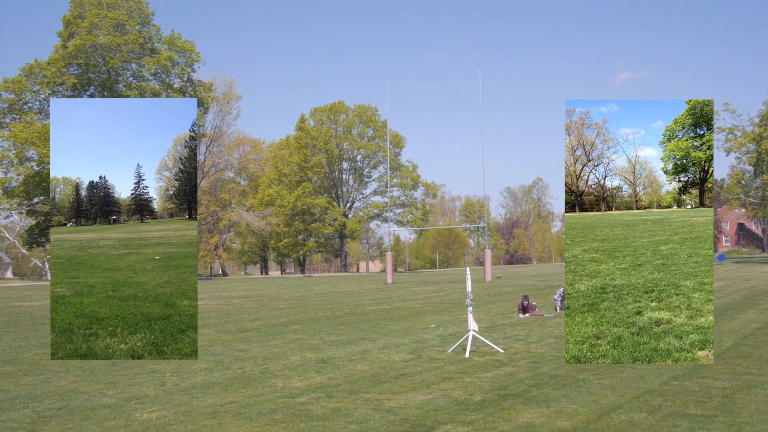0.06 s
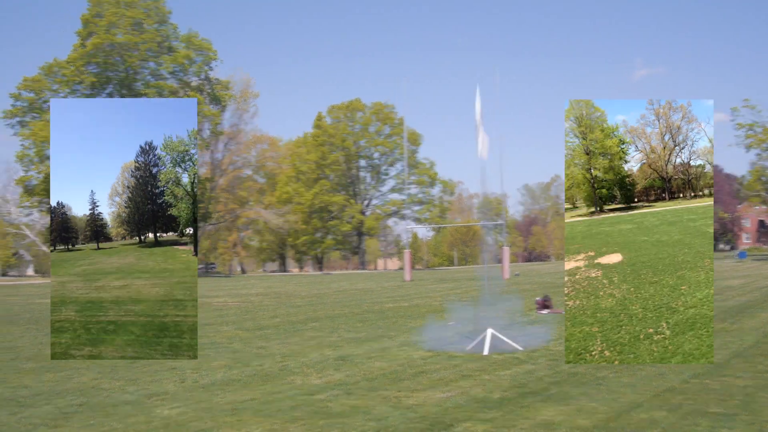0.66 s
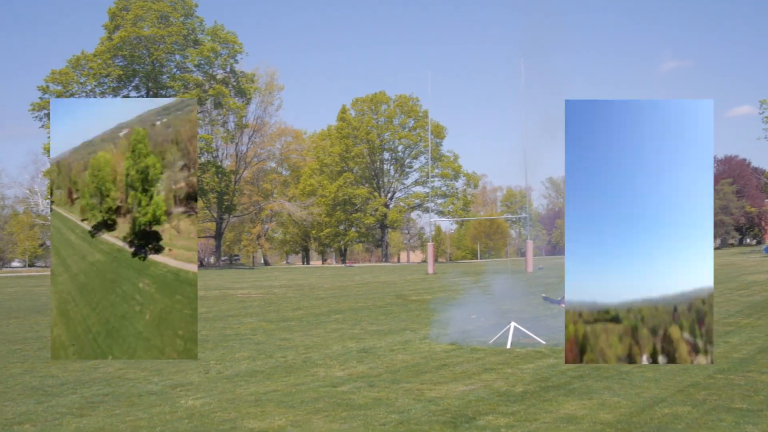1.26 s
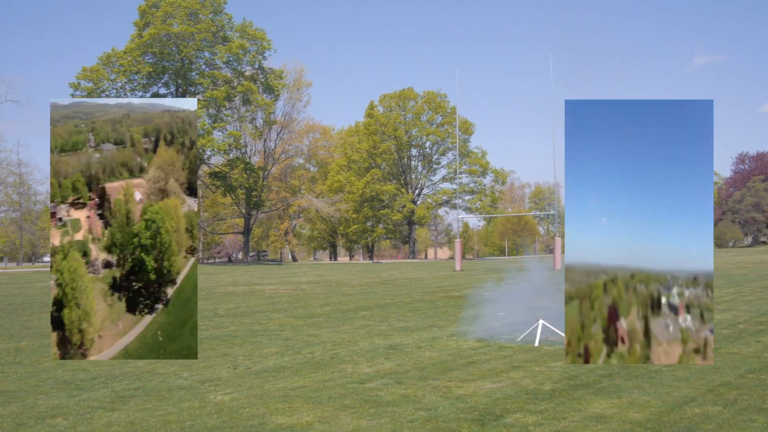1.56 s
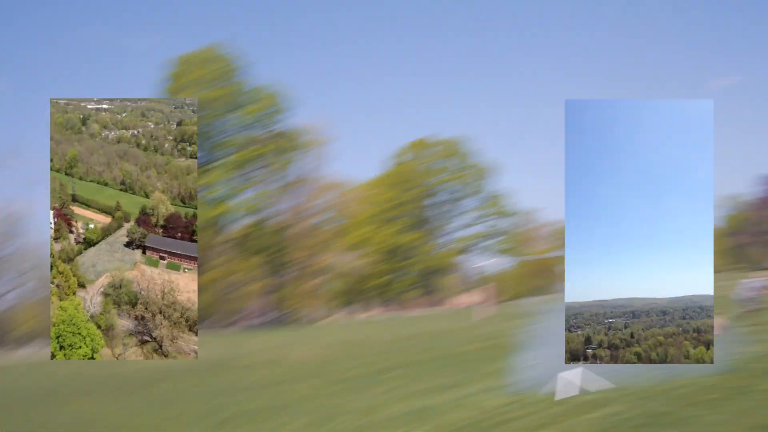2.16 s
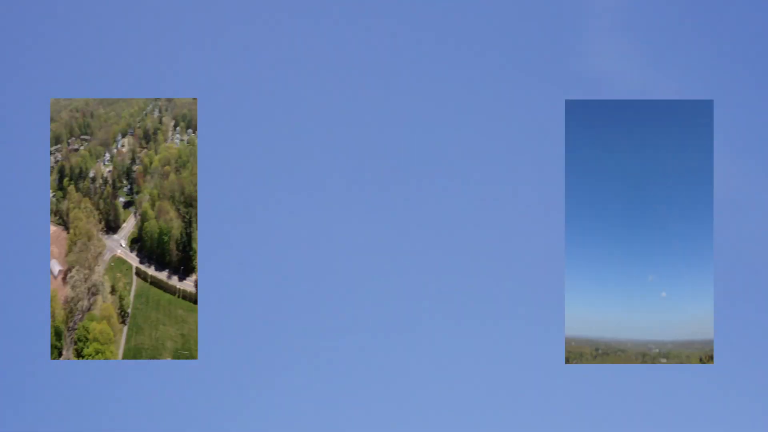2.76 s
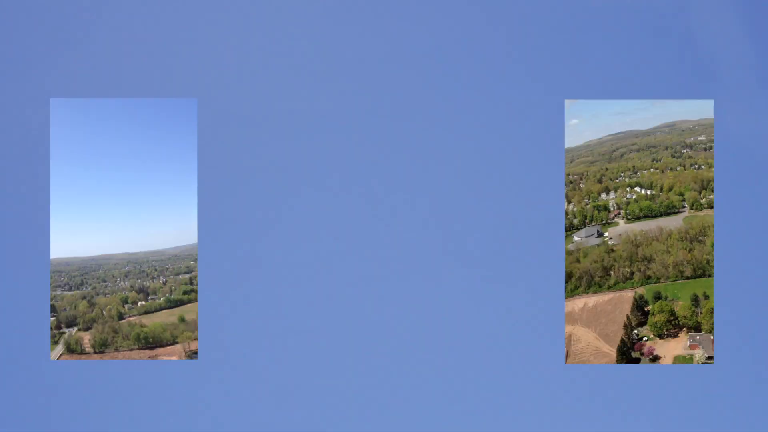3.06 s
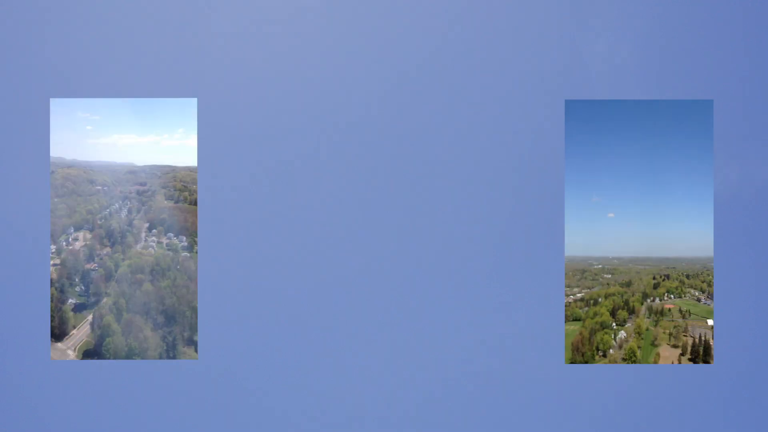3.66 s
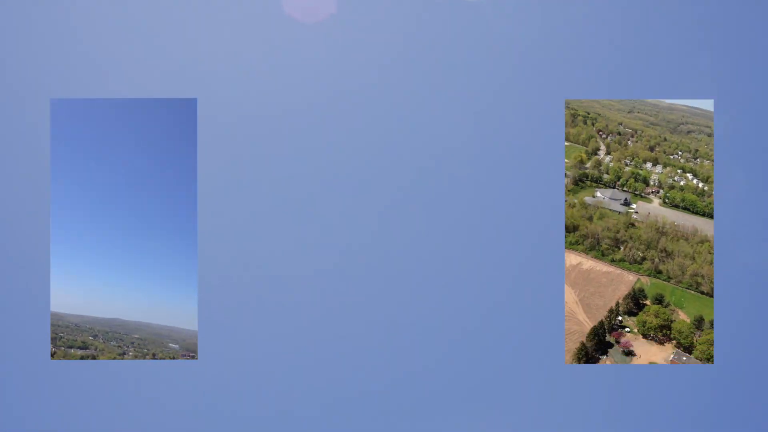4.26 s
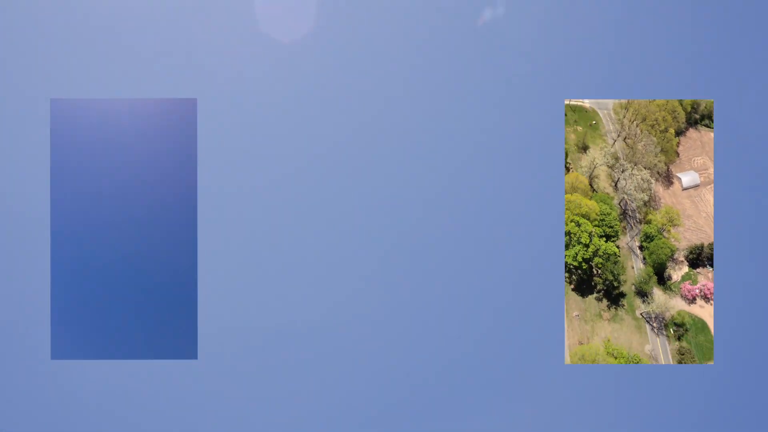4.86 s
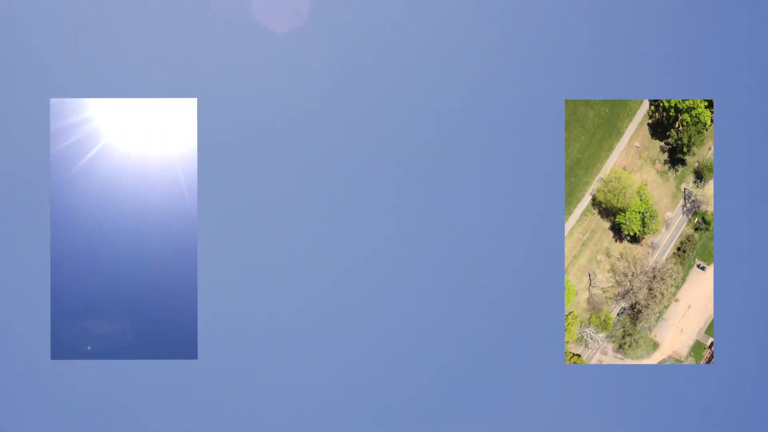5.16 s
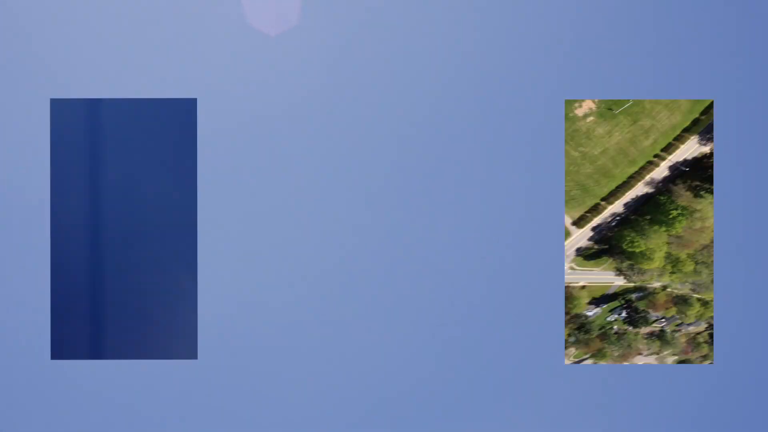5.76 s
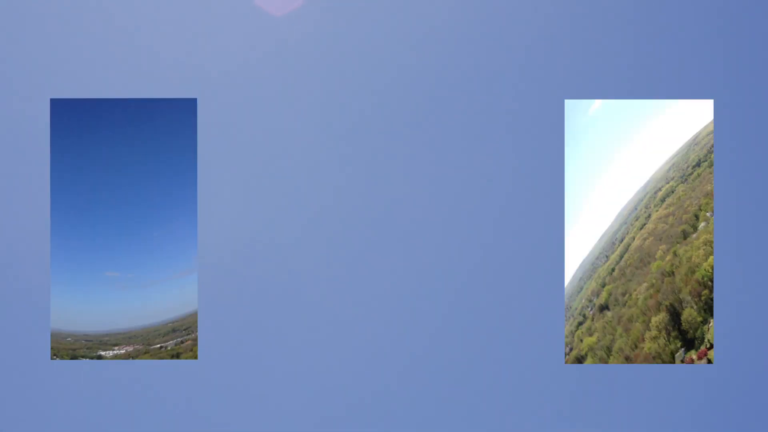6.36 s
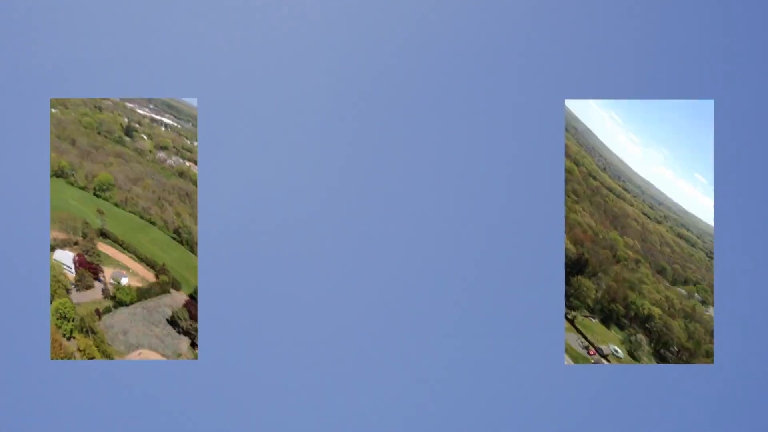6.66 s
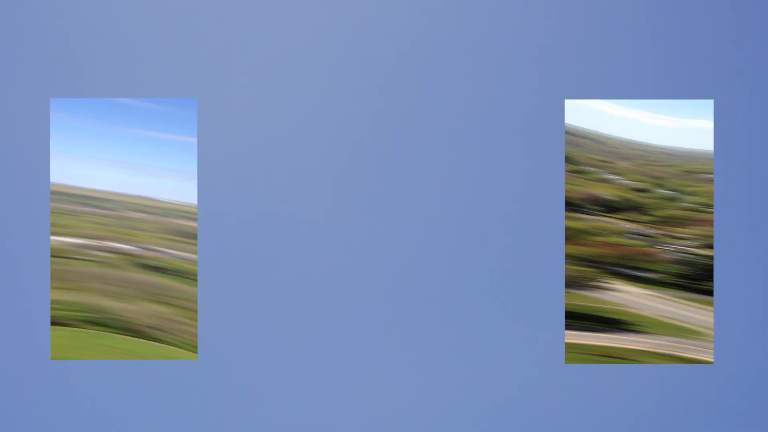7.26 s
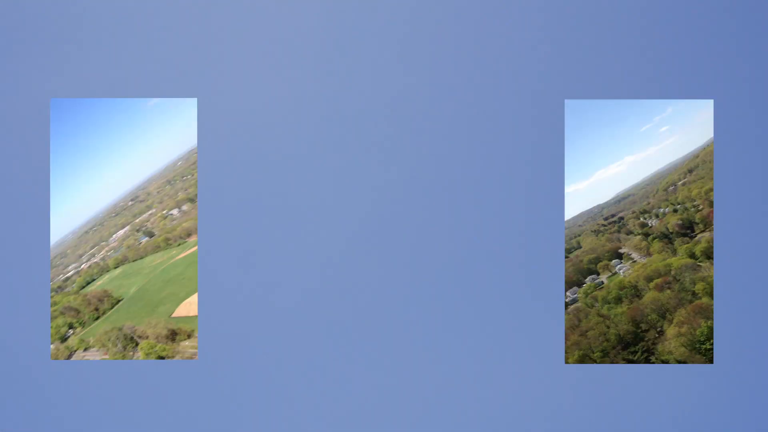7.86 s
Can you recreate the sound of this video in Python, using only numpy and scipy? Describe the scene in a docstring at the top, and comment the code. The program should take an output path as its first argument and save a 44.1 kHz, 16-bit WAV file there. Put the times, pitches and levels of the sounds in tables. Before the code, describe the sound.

An igniter pops and a hollow hiss swells into the loud roar of a model rocket, heard outdoors from a small microphone on its body. The roar fades into low, buffeting air with a few clicks. The ejection charge fires with a sharp crack and a clatter, and the open tube tumbles through uneven gusts, with hollow thumps, clicking fittings and a quick whoosh.

```python
"""Over a faint breeze an igniter pops: a model rocket, heard from a small microphone riding on its body.
The nozzle's hollow hiss swells to a roar, splashes off the pad and burns out; air tears past the tube.
The ejection charge fires with a crack and a gust, and the open body tumbles in slower, lumpier air.
Gusts rasp over the port, jolts thump the tube and set the housing humming, loose fittings click,
and the port whooshes as it swings through the airstream."""
import sys
import numpy as np
from scipy import signal
from scipy.fft import rfft, irfft, next_fast_len
from scipy.io import wavfile
from scipy.ndimage import uniform_filter1d, map_coordinates

SR = 44100
rng = np.random.default_rng(int(sys.argv[2]) if len(sys.argv) > 2 else 0)


def store_wav(level_fs):
    """Save 16-bit WAV to argv[1]."""
    pcm = np.round(np.clip(np.atleast_2d(level_fs), -1, 1) * 32767)
    wavfile.write(sys.argv[1], SR, pcm.T.astype(np.int16))


N = 348390
TIME = np.arange(N) / SR
IGNITION_S, LIFT_S, BURNOUT_S, EJECTION_S = .06, 0.55, 2.1, 3.53
CROSSOVER_HZ, TOP_HZ = (800, 3500), 15400  # low/middle/high splits; the microphone's upper limit

# ring of the motor casing: pitch_hz, level_db, t60_s
CASING_MODES = [(610, 4.5, 0.0093), (2050, 8.5, 0.0094), (8060, -14, 0.0067)]
# chamber pressure building to full thrust: time_s, level_db
CHAMBER_PRESSURE = [(.066, -25), (.1, -33.5), (.22, -28.5), (.28, -24.5), (.33, -18), (.376, -5.5)]
# base pitch of the nozzle's resonances, rising as the gas heats: time_s, pitch_hz
NOZZLE_PITCH = [(.06, 800), (.1, 719), (.22, 1060), (.33, 1296)]
# tone of the exhaust: frequency_hz, level_db
EXHAUST_SPECTRUM = [(40, -45), (90, -36), (160, -10.5), (320, -7), (850, 2.5), (2100, 7.5), (3300, 2),
                    (6800, 0), (8500, -2.5), (10200, -8.5), (12700, -5), (15500, -11.5)]
# low, middle and high band of the roar: level_db, db_per_pressure_db, flight_fade_db_per_s
ROAR_BANDS = [(-20, 0.84, 2.5), (-12, 0.97, 8), (-10, 1.26, 12.5)]
# two paths along the body cancel the exhaust here: centre_hz, width_hz, gain_db
BODY_NOTCHES = [(1494, 210, -3), (3340, 380, -8.5), (5080, 600, -8.5), (11100, 500, -3.5)]
# hollow ring of the exhaust as the rocket climbs away: centre_hz, width_hz, gain_db
CLIMB_PEAKS = [(2250, 420, 3), (3960, 220, 3)]
# the gap above the blast plate resonates lower as the rocket lifts: time_s, pitch_hz, level_db
PLATE_SWEEP = [(.378, 5200, -25), (.44, 3200, -19.5), (.485, 2000, -12.5), (.5, 894, -18),
               (.54, 724, -17.5), (.58, 357, -13), (.61, 320, -37)]
# roar thrown back by the pad: low_db, middle_db, high_db
PAD_BANDS_DB = [-28, -19.5, -22.5]
# brief sub-bass thuds as the microphone overloads on hard hits: start_s, level_db
OVERLOAD_THUDS = [(0.384, -22.5), (4.91, -23)]
# tone of the air in straight flight: frequency_hz, level_db
FLIGHT_SPECTRUM = [(40, -31), (70, -32.5), (110, -13), (160, -3.5), (305, 3.5), (420, -4), (540, -3),
                   (750, -15), (1500, -24.5), (2300, -26), (3100, -34), (8000, -42.5), (10300, -54)]
# buffet, rush and hiss in straight flight: top_speed_db, speed_exponent, yaw_share
AIR_BANDS = [(-14.5, 0.74, 1), (-20.5, 1.7, 0.45), (-26, 3.43, 0.037)]
# buffeting rides up and down as the rocket yaws into the flow: time_s, gain_db
YAW_BUFFET = [(1.25, -0.1), (1.8, 3.5), (1.93, -2), (2.05, -.5), (2.76, -0.2), (3.15, -4), (3.3, 1.5),
              (3.5, 0)]
# brief swerves on top of the yaw: peak_s, gain_db
SWERVE_BUFFET = [(1.849, 5), (2.31, -1.5), (2.52, 3), (2.76, 5), (3.362, 3.5)]
# sharp contacts of nose cone, cord and fittings: start_s, level_db, brightness_db, knock_hz
CONTACTS = [(2.129, -15.5, -15, 2400), (2.703, -21.5, -12, 2400), (2.953, -19, -11, 2040),
            (3.287, -17.5, -11.5, 1930), (3.539, 0, -5, 1970), (3.55, -7, -4, 2000),
            (3.586, -3.5, -19, 1200), (3.592, 0, -23, 1100), (3.6, -3, -19, 880), (3.602, -10, -10, 2520),
            (3.674, -14.5, -26, 910), (3.732, -21, -18, 800), (3.755, -24, -14, 1190),
            (3.779, -11, -27, 830), (3.836, -20, -12.5, 1020), (3.964, -25.5, -36, 905),
            (4.353, -23.5, -14, 1240), (5.194, -25, -16, 1710), (5.617, -24, -24, 2370),
            (5.783, -30.5, -24, 2220), (5.849, -22, -26, 2140), (6.119, -26.5, -4, 1110),
            (6.325, -8.5, -3.5, 980), (6.375, -16.5, -26, 845), (6.398, -21, -30, 3170),
            (6.464, -28, -13, 1710), (6.513, -14.5, -12.5, 1600), (6.81, -27.5, -9, 1970),
            (7.403, -8, -23, 1000), (7.437, -32.5, -6, 1920), (7.521, -20, -25, 1990),
            (7.599, -9, -34, 840), (7.646, -30, -13, 1500), (7.81, -20.5, -26, 1360),
            (7.855, -29, -7, 1700)]
# tone of the air in the tumble: frequency_hz, level_db
TUMBLE_SPECTRUM = [(45, -27), (110, -12), (170, -2.5), (260, -1), (380, -3), (620, -12), (1000, -10),
                   (1600, -19.5), (2400, -20), (3300, -27.5), (4600, -27), (5600, -33), (8300, -31.5),
                   (9600, -45.5), (15500, -50)]
# air over the tumbling body: time_s, buffet_db, rush_db
TUMBLE_FLOW = [(3.53, -21.5, -36), (3.68, -20, -46), (3.81, -31, -49), (4.23, -31.5, -50), (4.84, -38, -51),
               (5.01, -54, -65.5), (5.33, -40.5, -60), (5.5, -31.5, -41), (5.68, -24, -35),
               (6.33, -25.5, -45), (6.76, -23.5, -43), (6.88, -29.5, -52.5), (7.06, -33.5, -54),
               (7.31, -24, -46), (7.47, -28.5, -55), (7.64, -30.5, -43.5), (7.72, -33.5, -58.5),
               (7.89, -28.5, -57)]
# modes of the body tube once its end is open: centre_hz, width_hz, gain_db
OPEN_TUBE_MODES = [(247, 24, 1.5), (352, 23, 3), (595, 26, 10)]
# cord and air scuff past the housing: start_s, length_s, rise_s, level_db, buffet_offset_db
GUST_CUES = [(3.532, 0.029, 0.0051, -19, 7), (3.553, 0.052, 0.0069, -25.5, 15),
             (3.605, 0.027, .003, -26.5, -12), (3.753, 0.016, 0.0018, -34, 19.5),
             (3.851, 0.036, 0.0039, -42, 18.5), (4.282, 0.044, 0.0078, -42, 3),
             (4.382, 0.035, 0.008, -46, 7), (4.595, 0.017, 0.0097, -19.5, 4.5),
             (4.629, 0.027, 0.005, -37, 16), (4.764, 0.025, 0.0086, -26, 8),
             (4.87, 0.066, 0.0045, -39.5, 11.5), (4.894, 0.016, 0.0094, -22.5, 7),
             (5.056, 0.047, 0.0064, -47, 10.5), (5.179, 0.024, 0.0023, -36.5, 11.5),
             (5.26, 0.039, 0.026, -42.5, 11.5), (5.632, 0.066, 0.012, -48.5, 18),
             (6.026, 0.07, .008, -31, 16.5), (6.186, .1, 0.027, -33, 0), (6.516, 0.084, 0.002, -30.5, 17),
             (6.633, 0.12, 0.0048, -36.5, 14), (6.934, 0.033, 0.0042, -32.5, 16.5),
             (7.14, 0.14, 0.0022, -32, 14.5), (7.485, 0.072, 0.0043, -36.5, -15),
             (7.583, 0.029, 0.0032, -33.5, 12), (7.746, 0.0081, 0.0027, -36.5, -10)]
# low cut on the gusts, thinnest while the body hangs near the top of its flight: time_s, cutoff_hz
GUST_LOW_CUT = [(3.9, 110), (4.9, 260), (5.6, 165)]
# hum of the housing: pitch_hz, gain_db, t60_s
HOUSING_MODES = [(167.4, 3.5, 0.48), (433, -4.5, 0.17)]
# thumps of the jolted tube: start_s, level_db, pitch_hz
JOLT_CUES = [(3.713, -2, 253), (3.776, -5.5, 252), (3.836, -1.5, 271), (4.686, -10, 264),
             (4.699, -12.5, 167), (4.909, -7, 378), (5.193, -14, 360), (6.08, -7, 337), (6.12, -10, 392),
             (6.214, -11.5, 386), (6.324, -12.5, 548), (6.371, -8.5, 236), (6.409, -6, 176),
             (6.576, -1, 368), (7.092, -8.5, 377), (7.298, -8, 183), (7.402, -13, 480), (7.599, -7.5, 326),
             (7.681, -18, 390)]
# the port swings through the airstream: peak_s, level_db, rise_s, fall_s
PORT_SWINGS = [(5.44, -37.5, 0.038, 0.024), (6.013, -16, .02, 0.021)]


def amp(db):
    """Decibels to gain."""
    return 10 ** (np.asarray(db) / 20)


def unit(x):
    """Scale to rms 1."""
    return x / np.sqrt(np.mean(x ** 2) + 1e-20)


def held(bands, size):
    """Ride each band to rms 1 over a window of size samples."""
    return bands / np.sqrt(np.abs(uniform_filter1d(bands ** 2, size=size, axis=1)) + 1e-20)


def curves(rows):
    """One automation curve for each column after the time."""
    times, *columns = np.transpose(rows)
    return [np.interp(TIME, times, column) for column in columns]


def wobble(rate):
    """A smooth random curve, rate knots a second."""
    return map_coordinates(rng.standard_normal(int(N * rate / SR) + 4), [TIME * rate])


def add(track, start_s, sound):
    """Drop a short sound onto the track."""
    part = track[round(start_s * SR):][:len(sound)]
    part += sound[:len(part)]


def filtered(x, response):
    """Equalise x with a gain given as a function of frequency."""
    size = next_fast_len(N + SR // 2)
    return irfft(rfft(x, size) * response(np.fft.rfftfreq(size, 1 / SR)), size)[:N]


def bell_eq(x, bells):
    """Equalise x with smooth peaks or dips."""
    return filtered(x, lambda f: amp(sum(db * np.exp(-((f - hz) / w) ** 2) for hz, w, db in bells)))


def resonant_noise(centre_hz, width_hz):
    """Noise in a moving resonance with steep skirts, rms 1."""
    smooth = signal.butter(3, width_hz / 2, fs=SR, output="sos")
    drift = signal.sosfilt(smooth, rng.standard_normal(N) + 1j * rng.standard_normal(N))
    return unit(np.real(drift * np.exp(2j * np.pi * np.cumsum(centre_hz) / SR)))


def patchy(x, depth_db, size=512):
    """Shifting colour: short-lived peaks a few hundred Hz wide."""
    frames = signal.stft(x, nperseg=size)[2]
    ripple = rng.standard_normal(frames.shape)
    for _ in range(2):
        ripple = uniform_filter1d(uniform_filter1d(ripple, size=4, axis=0), size=9, axis=1)
    return signal.istft(frames * amp(depth_db * unit(ripple)), nperseg=size)[1][:N]


def turbulence(spectrum, patch_db, eddy_db=0, grain_db=0, size=4000):
    """Low, middle and high noise bands: eddies shake all three together, grain breaks up the top two."""
    hz, db = np.transpose(spectrum)
    white = patchy(rng.standard_normal(N), patch_db)
    noise = filtered(white, lambda f: amp(np.interp(np.log(f + 1), np.log(hz), db)))
    low, low_mid = [filtered(noise, lambda f: 1 / (1 + (f / edge) ** 8)) for edge in CROSSOVER_HZ]
    eddies = amp(eddy_db * wobble(70))
    grain = amp(grain_db * 2 * np.tanh(wobble(380) / 2))
    return held(eddies * np.array([low, (low_mid - low) * grain, (noise - low_mid) * grain]), size)


def breeze(level_db=-59):
    """A faint, low bed of wind over the launch field."""
    wind = filtered(rng.standard_normal(N), lambda f: f ** 3 / (f ** 3 + 130 ** 3) / (1 + (f / 330) ** 1.5))
    return amp(level_db) * unit(wind)


def igniter(start_s=0.058, level_db=-17, attack_s=0.00093):
    """The igniter pops and rings the motor casing."""
    out, t = np.zeros(N), np.arange(SR // 10) / SR
    ring = sum(amp(db - 60 * t / t60) * np.sin(2 * np.pi * hz * t) for hz, db, t60 in CASING_MODES)
    add(out, start_s, amp(level_db) * ring * (1 - np.exp(-t / attack_s)))
    return out


def nozzle_hiss():
    """Gas hisses in three of the nozzle's odd resonances, one to a band."""
    hz, = curves(NOZZLE_PITCH)
    high = amp(-17) * resonant_noise(9 * hz, width_hz=1200)
    low = resonant_noise(.88 * hz, width_hz=440)
    middle = amp(-3) * resonant_noise(3 * hz, width_hz=620)
    return np.array([low, middle, high])


def motor(choke_s=0.305, choke_spread_s=0.066, leak=0.02, tail_s=0.57):
    """The hollow hiss opens into a broad jet as pressure builds, then falls behind and burns out."""
    pressure_db, = curves(CHAMBER_PRESSURE)
    flown_s = np.maximum(TIME - LIFT_S, 0)
    levels = amp([db + grows * pressure_db - fade * flown_s for db, grows, fade in ROAR_BANDS])
    choked = (1 + np.tanh((TIME - choke_s) / choke_spread_s)) / 2
    jet_share = np.clip(choked + leak, 0, 1)
    hiss = np.sqrt(1 - jet_share) * nozzle_hiss()
    jet = np.sqrt(jet_share) * turbulence(EXHAUST_SPECTRUM, patch_db=2.0)
    burning = (TIME > IGNITION_S) * np.clip((BURNOUT_S - TIME) / tail_s, 0, 1)
    return exhaust_path(burning * np.sum(levels * (jet + hiss), axis=0), flown_s)


def exhaust_path(roar, flown_s, air_hz=9400, loss_db_per_s=12.5, hollow_s=0.97, hollow_spread_s=0.17):
    """Paths along the body notch the roar; in flight it loses its top and briefly rings hollow."""
    dull = filtered(roar, lambda f: 1 / (1 + (f / air_hz) ** 16))
    roar = dull + amp(-loss_db_per_s * flown_s) * (roar - dull)
    climbing = np.exp(-((TIME - hollow_s) / hollow_spread_s) ** 2)
    roar = roar + climbing * (bell_eq(roar, CLIMB_PEAKS) - roar)
    # notched twice as deep while the rocket stands still, easing off toward full thrust
    standing = np.clip((CHAMBER_PRESSURE[-1][0] - TIME) / 0.09, 0, 1)
    roar = roar * (1 - standing) + bell_eq(roar * standing, BODY_NOTCHES)
    return bell_eq(roar, BODY_NOTCHES)


def blast_plate(broad_width_hz=2700, tight_width_hz=720, tight_below_hz=2000, low_cut_hz=240):
    """The jet's ring above the blast plate starts broad and high, then narrows as it falls."""
    hz, db = curves(PLATE_SWEEP)
    near = (TIME > PLATE_SWEEP[0][0]) & (TIME < PLATE_SWEEP[-1][0])
    broad_share = np.clip(hz / tight_below_hz - 1, 0, 1)
    low_cut = signal.butter(2, low_cut_hz, "high", fs=SR)
    tight = signal.lfilter(*low_cut, resonant_noise(hz, tight_width_hz))
    broad = resonant_noise(hz, broad_width_hz)
    return near * amp(db) * (np.sqrt(broad_share) * broad + np.sqrt(1 - broad_share) * tight)


def pad_splash(start_s=.381, leave_s=0.013, burst_db=6, burst_s=0.019, rumble_db=-41, rumble_hz=110):
    """The jet hits the pad with a burst; roar and rumble bounce back until the rocket has left."""
    age = np.maximum(TIME - start_s, 0)
    near = (TIME > start_s) * (1 - np.tanh((TIME - LIFT_S) / leave_s)) / 2
    roar = amp(PAD_BANDS_DB) @ turbulence(EXHAUST_SPECTRUM, patch_db=2.5)
    rumble = unit(filtered(rng.standard_normal(N), lambda f: 1 / (1 + (f / rumble_hz) ** 2) ** 2))
    return near * amp(burst_db * np.exp(-age / burst_s)) * (roar + amp(rumble_db) * rumble)


def overload_thuds(decay_s=0.0083):
    """Brief sub-bass thuds, cued where the microphone overloads on hard hits."""
    out, u = np.zeros(N), np.arange(SR // 10) / SR / decay_s
    for start, db in OVERLOAD_THUDS:
        add(out, start, amp(db) * u * (2 - u) * np.exp(-u))
    return out


def airspeed(speed_up_s=0.72, coast_from_s=1.67, drag_per_s=0.64):
    """Share of top speed: thrust drives it up smoothly, drag wears it down."""
    driven = np.sin(np.pi / 2 * np.clip((TIME - LIFT_S) / speed_up_s, 0, 1)) ** 2
    return driven / (1 + drag_per_s * np.maximum(TIME - coast_from_s, 0))


def flight_air(swerve_s=0.016, flutter_db=1.0, tube_hz=235, tube_width_hz=13, tube_db=4):
    """Fast air rings the closed tube's first two modes; hiss follows speed most, buffet follows yaw."""
    speed = airspeed()
    swerve_db = sum(db * np.exp(-((TIME - peak) / swerve_s) ** 2) for peak, db in SWERVE_BUFFET)
    yaw_db = curves(YAW_BUFFET)[0] + swerve_db + flutter_db * wobble(25.87)
    levels = np.array([amp(db + share * yaw_db) * speed ** power for db, power, share in AIR_BANDS])
    flow = np.sum(levels * turbulence(FLIGHT_SPECTRUM, eddy_db=1.0, patch_db=1.25, size=2000), axis=0)
    modes = lambda f: sum(1 / (1 + ((f - k * tube_hz) / tube_width_hz) ** 2) for k in (1, 2))
    return filtered(flow, lambda f: amp(tube_db * modes(f)))


def squeak(peak_s, spread_s, peak_hz, bend, level_db):
    """A brief, thin squeal whose pitch arches."""
    u = np.clip((TIME - peak_s) / spread_s, -4, 4)
    hz = peak_hz * (1 - bend * (u ** 2 + wobble(2 / spread_s) / 10))
    return amp(level_db) * np.exp(-u ** 2) * unit(np.sin(2 * np.pi * np.cumsum(hz) / SR))


def clicks(knock_db=1, knock_rise_s=0.00094, knock_t60_s=0.016, spread=1.59,
           crack_db=6.0, crack_t60_s=0.0052, crack_band_hz=(2750, 5500)):
    """Nose cone and fittings make dry contacts: a bright crack on a hollow plastic-and-card knock."""
    out, t = np.zeros(N), np.arange(SR // 25) / SR
    crack_band = signal.butter(1, crack_band_hz, "band", fs=SR)
    for start, db, bright_db, hz in CONTACTS:
        noise = rng.standard_normal((2, len(t)))
        knock_band = signal.butter(3, [hz / spread, hz * spread], "band", fs=SR, output="sos")
        knock = held(signal.sosfilt(knock_band, noise[:1]), size=150)[0]
        knock *= (1 - np.exp(-t / knock_rise_s)) * amp(knock_db - 60 * t / knock_t60_s)
        crack = unit(signal.lfilter(*crack_band, noise[1]))
        crack *= amp(crack_db + bright_db - 60 * t / crack_t60_s)
        add(out, start, amp(db) * (knock + crack))
    return out


def tumble_air(dull_db_per_octave=3, lump_db=2.16, hiss_db=-35, hiss_grows=0.59, trim_db=-1, port_hz=120):
    """Slower, duller and lumpier flow rings the open tube; the hiss follows the rush."""
    buffet_db, rush_db = curves(TUMBLE_FLOW)
    levels = amp([buffet_db, rush_db, hiss_db + hiss_grows * rush_db]) * amp(lump_db * wobble(16))
    dulled = [(hz, db - dull_db_per_octave * np.log2(1 + hz / 900)) for hz, db in TUMBLE_SPECTRUM]
    flow = np.sum(levels * turbulence(dulled, eddy_db=2.5, grain_db=4.0, patch_db=3.0), axis=0)
    ring_db = lambda f: sum(db / (1 + ((f - hz) / width) ** 2) for hz, width, db in OPEN_TUBE_MODES)
    return filtered(flow, lambda f: amp(trim_db + ring_db(f)) * f / np.hypot(f, port_hz))


def gusts(fall_s=.011, hiss_db=-7.5, catch_db=-1.5, rasp_from_db=-28, rasp_grows=0.62):
    """Short grainy rushes over the housing, the first driven by the ejection charge; hard ones rasp."""
    bands = turbulence(TUMBLE_SPECTRUM, eddy_db=5.0, grain_db=4.5, patch_db=3.5, size=800)
    bands[1:] *= amp(catch_db * np.clip(wobble(200) - 1, 0, 1))  # the cord catches and slips
    rasp_band = signal.butter(1, [1900, 5600], "band", fs=SR)
    out = np.zeros(N)
    for start, length, rise, db, buffet_db in GUST_CUES:
        span = slice(round((start - rise) * SR), round((start + length + 2 * fall_s) * SR))
        opening = np.clip((TIME[span] - start + rise) / (2 * rise), 0, 1)
        closing = np.clip((start + length + 1.5 * fall_s - TIME[span]) / (2.5 * fall_s), 0, 1) ** 1.5
        rush = amp([db + buffet_db, db, db + hiss_db]) @ bands[:, span] * opening * closing
        rasp_gain = amp(rasp_grows * max(db - rasp_from_db, 0)) - 1
        rush = rush + rasp_gain * signal.filtfilt(*rasp_band, rush)
        cutoff_hz = np.interp(start, *np.transpose(GUST_LOW_CUT))
        low_cut = signal.butter(4, cutoff_hz, "high", fs=SR, output="sos")
        add(out, start - rise, signal.sosfilt(low_cut, np.pad(rush, (0, SR // 20))))
    return out


def housing_hum(blows):
    """The housing hums on faintly after each blow."""
    t = np.arange(SR // 2) / SR
    ring = np.zeros(len(t))
    for hz, db, t60 in HOUSING_MODES:
        unity_at_resonance = 2 * np.log(1000) / (t60 * SR)
        ring += unity_at_resonance * amp(db - 60 * t / t60) * np.sin(2 * np.pi * hz * t)
    return signal.fftconvolve(blows, ring)[:N]


def edge_whistle(start_s=3.6, attack_s=0.18, level_db=-65, fade_db_per_s=10,
                 first_hz=9200, last_hz=7800, sag_s=0.66):
    """Air whistles over an edge, sagging and fading as the body slows."""
    age = np.maximum(TIME - start_s, 0)
    hz = last_hz + (first_hz - last_hz) * np.exp(-age / sag_s)
    envelope = np.minimum(age / attack_s, 1) * amp(level_db - fade_db_per_s * age)
    return envelope * resonant_noise(hz, width_hz=1100)


def jolts(trim_db=-3, swell_s=0.0037, port_hz=150):
    """Each jolt of the tube is a low thump of a few cycles; the small port passes no deep bass."""
    out, t = np.zeros(N), np.arange(SR // 12) / SR
    envelope = t / swell_s * np.exp(1 - t / swell_s)
    for start, db, hz in JOLT_CUES:
        phase = rng.uniform(0, 2 * np.pi)
        add(out, start, amp(db + trim_db) * envelope * np.sin(2 * np.pi * hz * t + phase))
    return signal.lfilter(*signal.butter(2, port_hz, "high", fs=SR), out)


def whooshes(hiss_db=-6, rasp_db=-8, rasp_hz=4700):
    """Each swing through the airstream swells and dies away, with a rasp from the rim of the port."""
    swell = sum(amp(db) * np.exp(-np.maximum((peak - TIME) / rise, (TIME - peak) / fall))
                for peak, db, rise, fall in PORT_SWINGS)
    buffet, rush, hiss = turbulence(TUMBLE_SPECTRUM, eddy_db=3.0, patch_db=-0.5, size=1100)
    rasp = resonant_noise(np.full(N, rasp_hz), width_hz=1500)
    return swell * (buffet + rush + amp(hiss_db) * hiss + amp(rasp_db) * rasp)


def scene():
    """Launch, flight and tumble meet at the one microphone."""
    launch = igniter() + motor() + pad_splash() + blast_plate() + overload_thuds()
    blows = gusts() + jolts()
    body = blows + housing_hum(blows) + whooshes() + clicks()
    air = np.where(TIME < EJECTION_S, flight_air(), tumble_air()) + edge_whistle()
    flight_squeal = squeak(peak_s=1.681, spread_s=0.013, peak_hz=9850, bend=.025, level_db=-25.5)
    nose_cone_exit = squeak(peak_s=3.532, spread_s=0.004, peak_hz=8700, bend=0.018, level_db=-23)
    return (launch + body + air + flight_squeal + nose_cone_exit + breeze())[None]


def record(dry, ceiling=0.46, hardness=5, low_cut_hz=25):
    """The small microphone soft-clips and trims both ends of the range; both channels are the same."""
    x = dry[0]
    x = x / (1 + np.abs(x / ceiling) ** hardness) ** (1 / hardness)
    x = signal.lfilter(*signal.butter(1, low_cut_hz, "high", fs=SR), x)
    x = filtered(x, lambda f: (1 - np.tanh((f - TOP_HZ) / 110)) / 2)
    return np.array([x, x])


dry = scene()
out = record(dry)
store_wav(out)
```